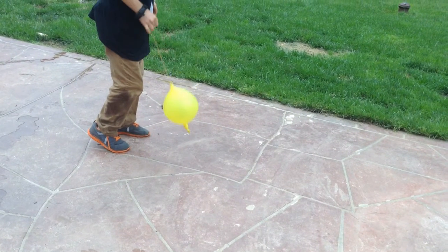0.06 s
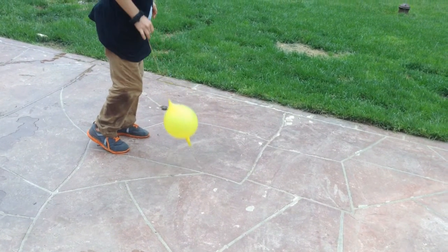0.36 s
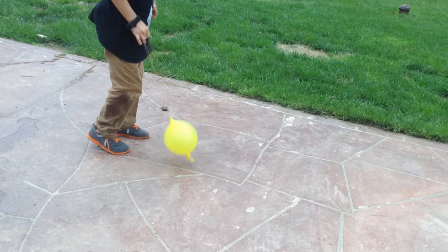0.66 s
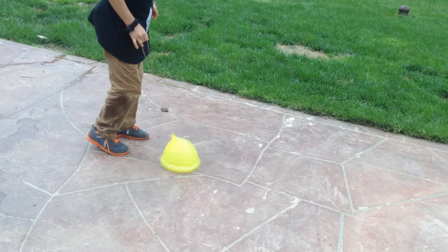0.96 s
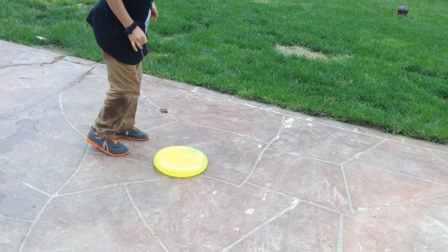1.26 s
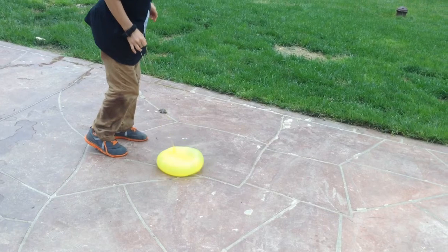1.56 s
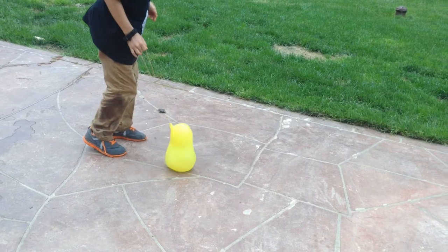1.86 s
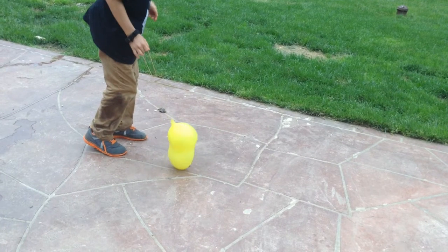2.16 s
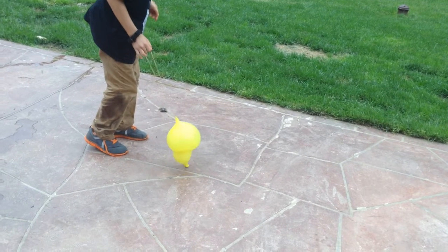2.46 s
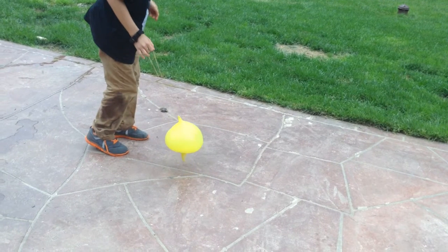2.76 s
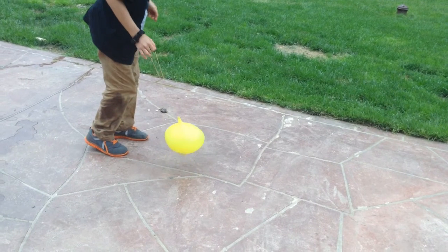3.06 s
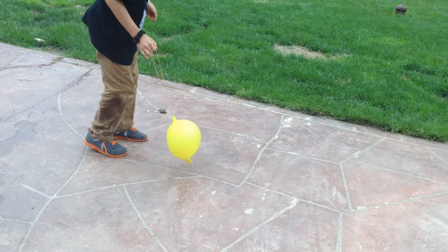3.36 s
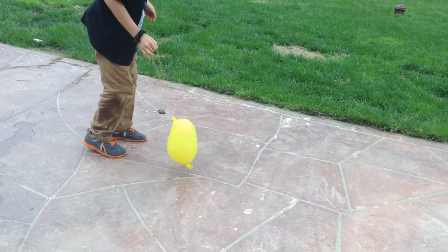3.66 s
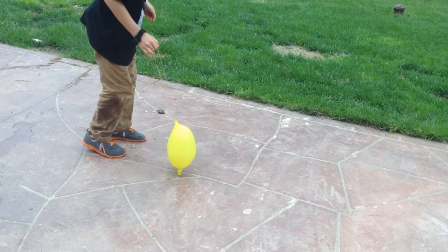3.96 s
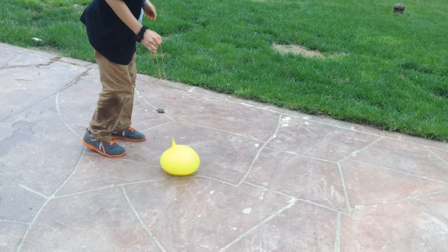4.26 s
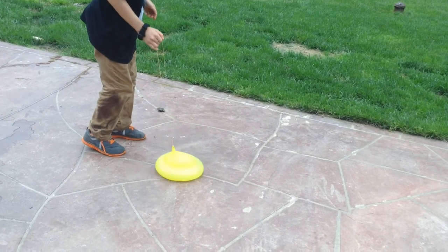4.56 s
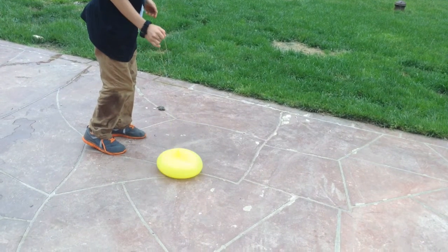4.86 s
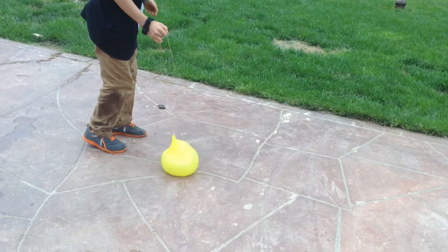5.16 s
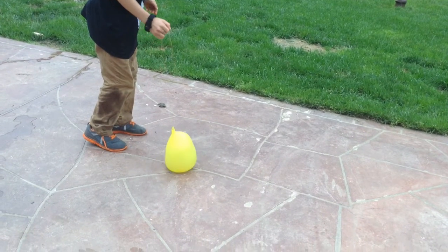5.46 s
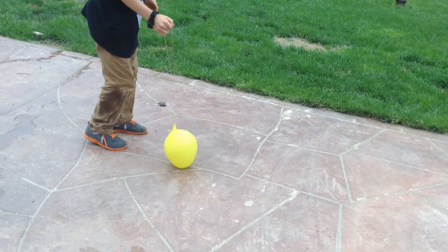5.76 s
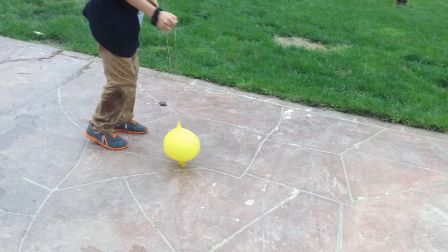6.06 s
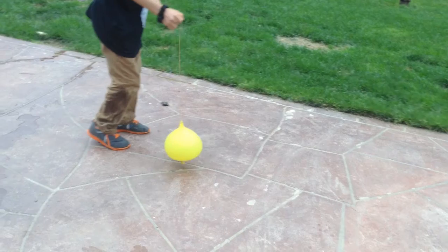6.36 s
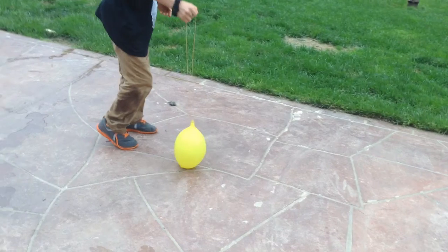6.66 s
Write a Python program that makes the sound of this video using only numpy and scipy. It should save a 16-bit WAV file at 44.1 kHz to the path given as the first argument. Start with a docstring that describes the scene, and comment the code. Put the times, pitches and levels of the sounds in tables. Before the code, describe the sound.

A water balloon on an elastic string bounces on a stone patio, heard slowed down, deep and dull. A faint low hum fades, then the balloon lands in a quick run of rubber smacks. Water churns and gurgles inside while the whole balloon throbs and the rubber ticks. A second, harder slap follows, then faint smacks, and the water settles into a soft rumble of outdoor air. One microphone picks up the balloon in front.

```python
"""A stone patio outdoors, one microphone on a water balloon on an elastic string, in slow motion:
all is deep, dull and drawn out. At first the air rumbles and a low hum, like earlier sloshing, dies
away. At 0.8 s the balloon slaps the stone in a quick run of rubber smacks; the water churns as it
flattens and gathers itself, the whole balloon throbs, and the rubber ticks now and then. At 4.4 s
comes a second, harder slap. Faint smacks follow at 5.4 s, and the water settles into the rumble."""
import sys
import numpy as np
from scipy import signal
from scipy.fft import rfft, irfft, next_fast_len
from scipy.io import wavfile
from scipy.ndimage import uniform_filter1d, minimum_filter1d

SR = 44100
rng = np.random.default_rng(int(sys.argv[2]) if len(sys.argv) > 2 else 0)


def transcribe(u):
    """Save the signal u as a 16-bit wav file named by the first command-line argument.

    u: samples, shape (n,) or (channels, n), limited to [-1, 1]; the rate is SR.
    q: integer samples, one column per channel.
    """
    v = np.clip(np.atleast_2d(u).T, -1, 1)
    q = np.round(v * 32767).astype(np.int16)
    wavfile.write(sys.argv[1], SR, q)


N = 300691
TIME = np.arange(N) / SR

# spectra of the outdoor air and of the low hum that dies away: frequency_hz, relative_db
AIR_SPECTRUM = [(12, -12.5), (27, -2), (45, -2), (65, -8.5), (130, -13), (300, -20), (700, -25),
                (1450, -31), (1900, -37.5)]
HUM_SPECTRUM = [(60, -9.5), (130, -2), (220, -3), (290, -7.5), (370, -3), (470, -13.5), (580, -15),
                (720, -36.5)]
# the balloon wobbling as a whole: start_s, level_db, pitch_hz, t60_s
WOBBLES = [(0.814, -31, 38.1, 0.91), (1.42, -19.5, 35.1, 0.27), (1.889, -34.5, 40.35, 2),
           (2.899, -27, 32, 1.1), (4.458, -22.5, 29.67, 0.39), (5.02, -25.5, 32, 0.25),
           (5.445, -34.5, 34.7, 0.27)]
# modes of the taut skin: pitch_hz, relative_db, t60_s
SKIN_MODES = [(351.8, -8.5, 0.037), (635, -9.5, 0.14), (787, -2, 0.096), (900, -3, 0.054),
              (1103, -6.5, 0.11), (1160, -18, 0.15), (1410, -6.5, 0.067), (1524, -9, 0.043),
              (1640, -13, 0.061), (1784, 0.5, 0.17)]
# spectra of small, large and the heaviest splashes: frequency_hz, relative_db
FIZZ_SPECTRUM = [(400, -23), (590, 3), (690, -0.5), (800, -1), (950, -0.5), (1040, -0.5), (1250, -2),
                 (1450, -4.5), (1900, -7.5)]
SLOSH_SPECTRUM = [(130, -24.5), (200, 2), (300, 1), (360, 0.5), (440, -2), (490, 0.5), (580, -9),
                  (800, -37.5)]
GULP_SPECTRUM = [(25, -12), (45, 2.5), (62, -6), (88, 0), (120, -3), (145, -1), (190, -2.5), (280, -20.5)]
# water thrown about as the balloon lands, spreads, recoils and lifts off:
# peak_s, slosh_relative_db, swell_s, fizz_over_slosh_db, gulp_over_slosh_db
SURGES = [(0.837, -26, .012, 3, -5), (1.0, -27, 0.059, 2.5, 3.5), (1.108, -32.5, 0.045, 6, 7.5),
          (1.195, -31, 0.0073, 5, -4), (1.343, -27.5, 0.038, -1, 1), (1.459, -24.5, 0.03, 3, 3),
          (1.68, -39, 0.044, -2, 1), (2.19, -50.5, 0.14, 3.5, -1), (2.422, -44, 0.068, -8, -11),
          (2.592, -43, 0.079, -2.5, -5), (2.856, -36, 0.058, 1.5, -9), (2.941, -44.5, 0.079, -10, 11),
          (3.74, -59, .06, 2, 0), (4.361, -60.5, 0.13, 0, 11), (4.479, -31, 0.0088, 3.5, -3.5),
          (4.871, -41.5, 0.11, -1.5, -6), (4.999, -35.5, 0.02, -4, -6), (5.432, -43, 0.0028, 1.5, -7)]
# single pockets of water and air that hoot: peak_s, relative_db, pitch_hz, width_s
GURGLES = [(0.979, -16, 256, 0.0085), (1.0, -23, 816, 0.017), (1.072, -21, 85.9, 0.059),
           (1.128, -19, 120.5, 0.044), (1.35, -18.5, 196.3, 0.015), (1.44, -14.5, 129.7, 0.017),
           (1.469, -19.5, 264, 0.014), (1.47, -20.5, 577, 0.017), (2.412, -46.5, 380, 0.025),
           (2.573, -39, 306, 0.023), (2.854, -30, 1150, 0.011), (2.879, -25.5, 354.5, 0.024),
           (3.68, -41, 481, 0.005), (5.018, -33, 734, 0.012)]
# the tip of the balloon brushing the stone as it lands: start_s, level_db, length_s
RUBS = [(0.726, -46.5, 0.089), (0.802, -33, 0.048), (4.428, -31, 0.02)]
# small ticks of stretched rubber and string: start_s, relative_db, pitch_hz
TICKS = [(0.3355, -52, 1440), (1.0177, -10.5, 856), (1.0931, -16, 1480), (1.195, -11.5, 620),
         (1.446, -15, 950), (1.464, -15, 1390), (1.6838, -21, 1400), (3.7125, -49.5, 970),
         (3.8301, -43, 1090), (6.051, -53.5, 905), (6.473, -47.5, 922), (6.592, -45.5, 600),
         (6.6017, -42, 1240)]
# spray of fine contacts where the rubber lands or creases: peak_s, level_db, width_s
SPLATS = [(0.815, -17.5, 0.0074), (1.196, -23, 0.0044), (2.229, -45.5, .012), (2.854, -31.5, 0.015),
          (4.444, -11, 0.011), (5.011, -38.5, 0.01), (5.432, -38, 0.0066), (6.488, -56.5, 0.01),
          (6.564, -67, 0.049)]
# the loudest folds of rubber smacking down: start_s, level_db, pitch_hz
SMACKS = [(0.7189, -31.5, 922), (0.762, -24.5, 1170), (0.8022, -7, 560), (0.8042, -8.5, 1500),
          (0.8091, -3, 1580), (0.8107, -3.5, 1430), (0.8152, -3, 1153), (0.8228, -6, 1450),
          (4.4275, -15.5, 804), (4.4302, -4, 1130), (4.4329, -3.5, 1460), (4.4389, 0.5, 336),
          (4.4450, 5.5, 414), (4.4495, -19, 1610), (4.4513, 1, 510), (4.4570, -16.5, 1110),
          (4.4625, -14.5, 750), (5.4222, -20.5, 743), (5.4247, -23.5, 1390)]


def from_db(db):
    """Decibels to gain."""
    return 10 ** (np.asarray(db) / 20)


def bell(offset, width):
    """A bell curve of height 1."""
    return np.exp(-.5 * np.minimum(np.abs(offset) / width, 10) ** 2)


def dying(age, t60_s):
    """Gain that falls by 60 dB in t60_s."""
    return from_db(-60 * age / t60_s)


def ring(start_s, hz, t60_s):
    """A sine of height 1 that starts at start_s and dies away."""
    out, first = np.zeros(N), int(start_s * SR) + 1
    age = TIME[first:first + int(1.5 * t60_s * SR)] - start_s
    out[first:first + len(age)] = np.sin(2 * np.pi * hz * age) * dying(age, t60_s)
    return out


def grains(per_s, spread_db):
    """Tiny impulses of uneven size at random moments."""
    sizes = from_db(spread_db * np.minimum(rng.exponential(1, N), 4)) * rng.choice([-1, 1], N)
    return sizes * (rng.random(N) < per_s / SR)


def filtered(x, gain_at):
    """Weight every frequency of x by gain_at(hz)."""
    size = next_fast_len(N, real=True)
    hz = np.arange(size // 2 + 1) * SR / size
    return irfft(rfft(x, size) * gain_at(hz), size)[..., :N]


def low_pass(x, edge_hz):
    """Nothing passes above a steep edge."""
    return filtered(x, lambda hz: 1 / np.sqrt(1 + (hz / edge_hz) ** 240))


def coloured(x, spectrum):
    """Shape x by a spectrum that falls 36 dB an octave beyond its ends; rms 1."""
    points_hz, db = np.transpose(spectrum)

    def gain_at(hz):
        octave, points = np.log2(hz + 1), np.log2(points_hz)
        beyond = np.abs(octave - np.clip(octave, points[0], points[-1]))
        return from_db(np.interp(octave, points, db) - 36 * beyond)
    shaped = filtered(x, gain_at)
    return shaped / np.sqrt(np.mean(shaped ** 2) + 1e-20)


def steadied(x, span_s):
    """Even out swells slower than span_s."""
    return x / np.sqrt(uniform_filter1d(x ** 2, max(int(span_s * SR), 8)) + 1e-6)


def air(level_db):
    """Outdoor air rumbles steadily around the patio."""
    return from_db(level_db) * steadied(coloured(rng.standard_normal(N), AIR_SPECTRUM), span_s=0.16)


def hum(start_db, fade_db_per_s, rest_db):
    """A low hum, like earlier sloshing dying away, fades to a faint rest."""
    fade = from_db(start_db - fade_db_per_s * TIME) + from_db(rest_db)
    return fade * steadied(coloured(rng.standard_normal(N), HUM_SPECTRUM), span_s=0.037)


def wobble():
    """The mass of water swings against the rubber with a deep throb."""
    return sum(from_db(db) * ring(start_s, hz, t60_s) for start_s, db, hz, t60_s in WOBBLES)


def skin(push):
    """The taut rubber rings in its own modes."""
    out = 0
    for hz, db, t60_s in SKIN_MODES:
        radius = dying(1 / SR, t60_s)
        feedback = [1, -2 * radius * np.cos(2 * np.pi * hz / SR), radius * radius]
        out = out + from_db(db) * signal.lfilter([1 - radius, 0, radius - 1], feedback, push + 1e-18)
    return out


def churn(per_s, spectrum, span_s, skin_db):
    """Splashes inside the balloon, heard through its ringing skin; rms 1."""
    splashes = grains(per_s, spread_db=0.5)
    through_skin = splashes + from_db(skin_db) * skin(splashes)
    return steadied(coloured(through_skin, spectrum), span_s)


def lurch(spread_db=2, per_s=30):
    """The churning is uneven: a gain that wanders at random around 1."""
    steps = rng.standard_normal(size=1000)
    return from_db(spread_db * np.interp(TIME * per_s, np.arange(len(steps)), steps))


def surging():
    """Strength of fizz, slosh and gulp: each surge swells, collapses and rocks on; their powers add."""
    t, power = TIME[::64], 0
    lasts = np.array([[0.9], [1], [1.18]])   # decay time relative to the slosh: heavy water settles last
    for peak_s, db, swell_s, fizz_db, gulp_db in SURGES:
        levels = from_db([[db + fizz_db], [db], [db + gulp_db]])
        rise = bell(np.minimum(t - peak_s, 0), swell_s)
        age = np.maximum(t - peak_s, 0)
        collapse = dying(age, t60_s=0.78 * lasts)
        rocking = from_db(-13.5) * dying(age, t60_s=3.19 * lasts)
        power = power + (levels * rise * np.hypot(collapse, rocking)) ** 2
    return [np.interp(TIME, t, np.sqrt(layer)) * lurch() for layer in power]


def water(fizz_db, slosh_db, gulp_db):
    """Countless small splashes fizz, fewer large ones slosh, and the heaviest surges gulp."""
    fizz = from_db(fizz_db) * churn(per_s=2500, spectrum=FIZZ_SPECTRUM, span_s=0.044, skin_db=-5)
    slosh = from_db(slosh_db) * churn(per_s=1200, spectrum=SLOSH_SPECTRUM, span_s=0.076, skin_db=-6.5)
    gulp = from_db(gulp_db) * churn(per_s=500, spectrum=GULP_SPECTRUM, span_s=0.074, skin_db=-14)
    return sum(strength * layer for strength, layer in zip(surging(), (fizz, slosh, gulp)))


def gurgles(gain_db):
    """Each pocket of water and air swells and fades on one pitch."""
    out = np.zeros(N)
    for peak_s, db, hz, width_s in GURGLES:
        near = np.abs(TIME - peak_s) < 10 * width_s
        offset = TIME[near] - peak_s
        out[near] += from_db(db + gain_db) * bell(offset, width_s) * np.sin(2 * np.pi * hz * offset)
    return out


def rub(attack_s=0.0048, release_s=0.0052):
    """The tip of the balloon brushes the stone in fine slips."""
    slips = grains(per_s=2500, spread_db=1.5)
    pressure = 0
    for start_s, db, length_s in RUBS:
        rise = bell(np.minimum(TIME - start_s, 0), attack_s)
        fall = bell(np.maximum(TIME - start_s - length_s, 0), release_s)
        pressure = pressure + from_db(db) * rise * fall
    return pressure * coloured(slips, [(60, -4.0), (400, -5.0), (1000, 8.5), (1900, -8.5)])


def slaps(skin_db, tick_gain_db):
    """Folds of rubber hit the stone one after another; every smack, tick and splat rings the skin."""
    # tauter, higher folds ring longer
    smacks = sum(from_db(db) * ring(s, hz, t60_s=0.01 * (hz / 1000) ** 0.55) for s, db, hz in SMACKS)
    ticks = sum(from_db(db + tick_gain_db) * ring(s, hz, t60_s=0.0092) for s, db, hz in TICKS)
    bursts = sum(from_db(db) * bell(TIME - peak_s, width_s) for peak_s, db, width_s in SPLATS)
    spray = coloured(grains(per_s=3000, spread_db=3), [(100, 0.94), (600, -0.42), (1900, -2.5)])
    contact = smacks + ticks + bursts * steadied(spray, span_s=0.013)
    return contact + from_db(skin_db) * skin(contact)


def scene():
    """One microphone on the patio: the balloon in front, the open air behind."""
    balloon = slaps(skin_db=4.5, tick_gain_db=3.5)
    balloon += water(fizz_db=-1.4, slosh_db=0.1, gulp_db=-0.42)
    balloon += gurgles(gain_db=-4) + rub() + wobble()
    background = air(level_db=-57.5) + hum(start_db=-48.5, fade_db_per_s=13.5, rest_db=-76.5)
    return (balloon + background)[None]


def record(dry):
    """Slow motion dulls everything; a fast limiter holds the smacks, and the hardest just clips."""
    dull = low_pass(dry, edge_hz=1900)
    ceiling = 1.03
    allowed = ceiling / np.maximum(np.abs(dull), ceiling)
    gain = uniform_filter1d(minimum_filter1d(allowed, size=221), size=201)
    return low_pass(np.clip(dull * gain, -1, 1), edge_hz=16000)


dry = scene()
out = record(dry)
transcribe(out)
```